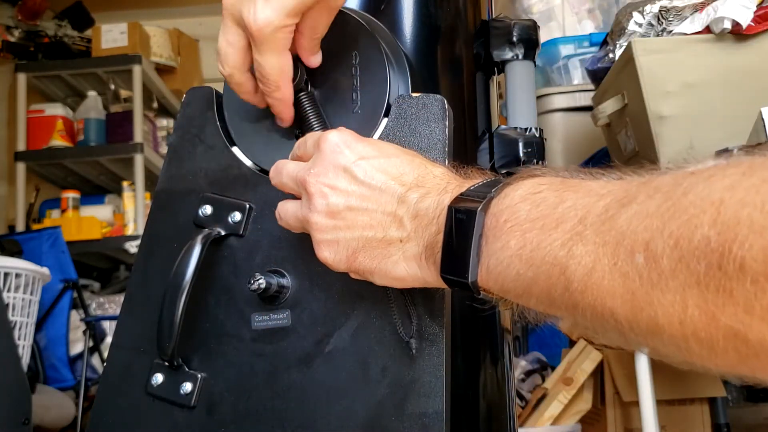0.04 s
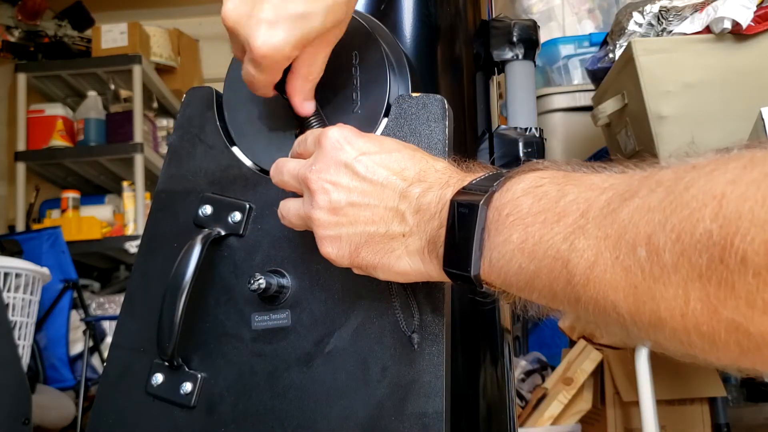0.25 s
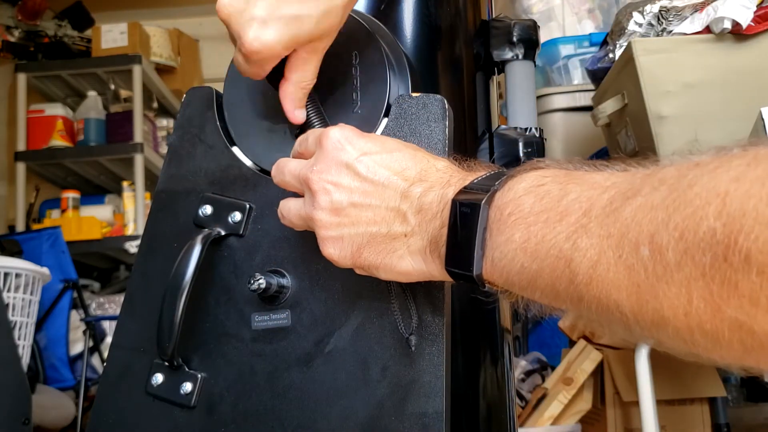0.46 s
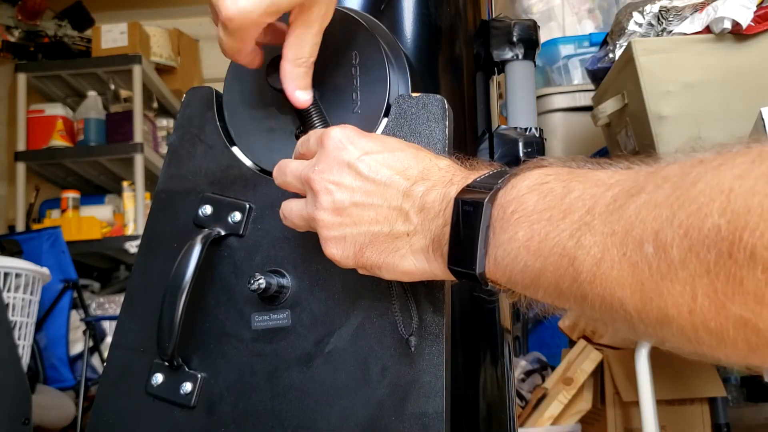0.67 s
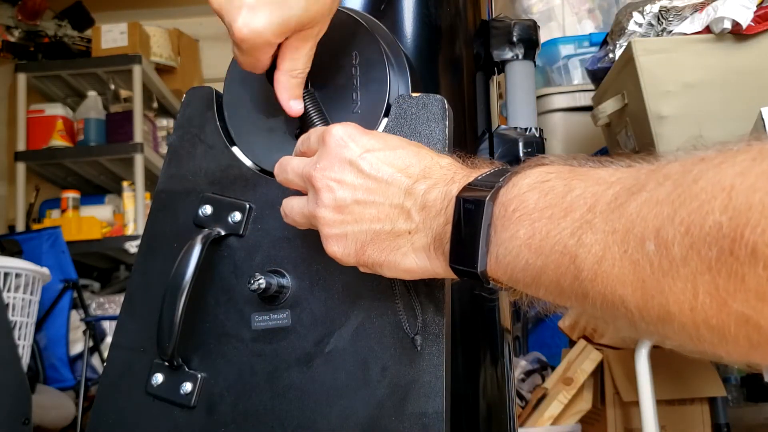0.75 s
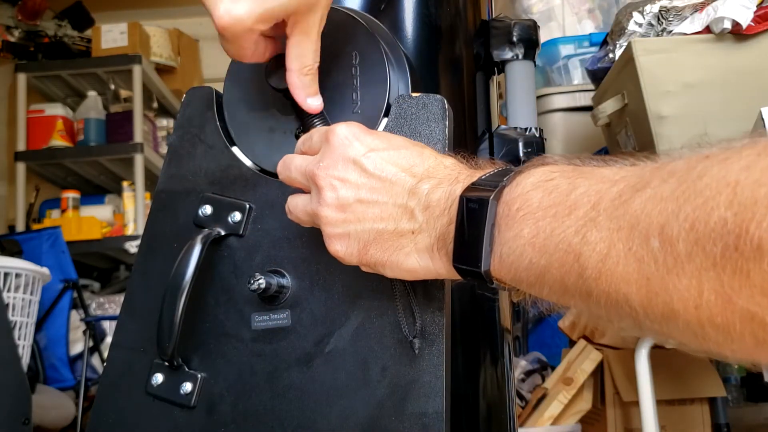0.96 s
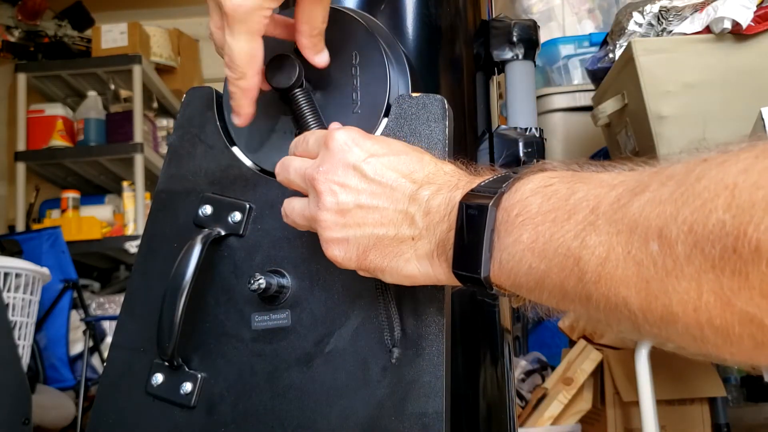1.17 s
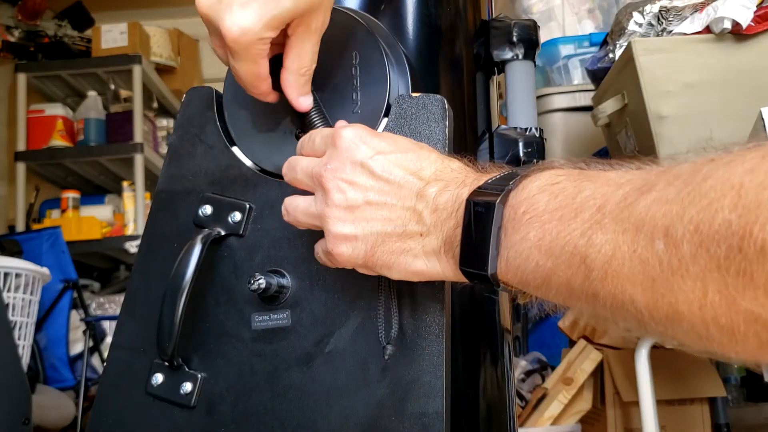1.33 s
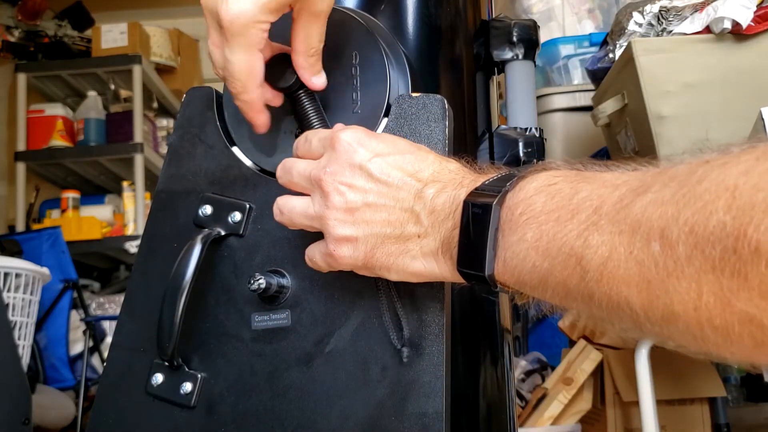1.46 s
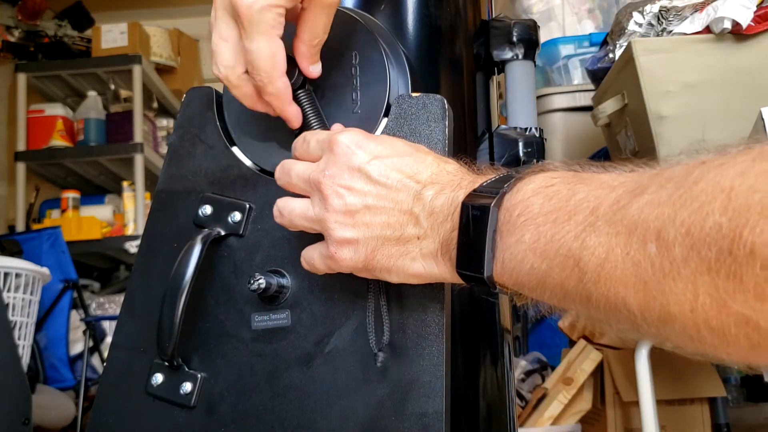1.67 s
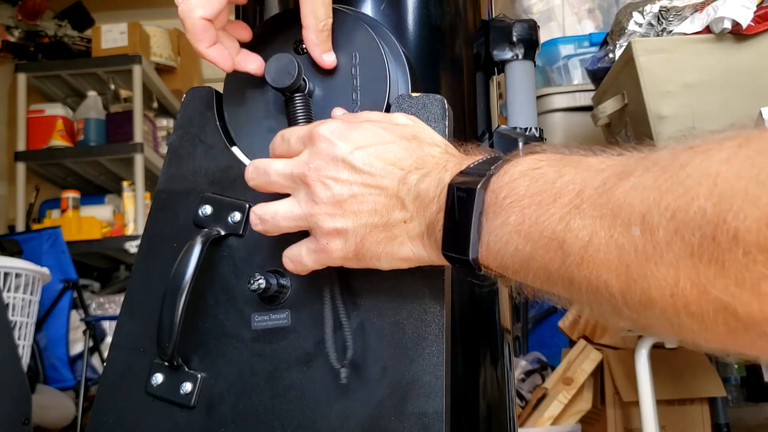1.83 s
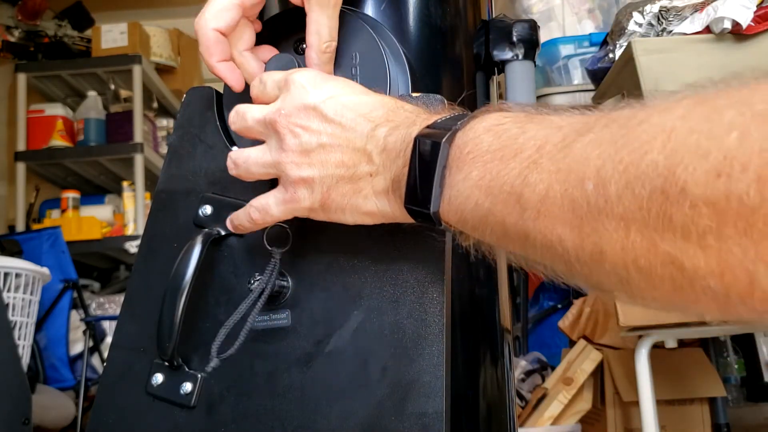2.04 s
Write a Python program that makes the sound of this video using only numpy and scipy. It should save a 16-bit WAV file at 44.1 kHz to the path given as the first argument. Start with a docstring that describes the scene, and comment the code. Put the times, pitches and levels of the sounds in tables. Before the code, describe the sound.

Short metallic clacks and scrapes as hands drag a spring across a metal edge.

```python
"""A coil spring clacks and scrapes as hands work it over the edge of a metal base.
Each coil catches and snaps free in a short ratcheting clack; dragging makes many tiny slips
that blur into a scrape. Base and spring ring briefly, and some clacks come with a pitched ring
or a bright crack. Edges tick and the small storage room answers. Under it all lie rubbing hands,
a machine hum and a low rumble."""
import sys
import numpy as np
from scipy import signal
from scipy.fft import rfft, irfft
from scipy.io import wavfile
from scipy.ndimage import uniform_filter1d

SR = 44100
rng = np.random.default_rng(int(sys.argv[2]) if len(sys.argv) > 2 else 0)


def dump_mix(stems):
    """Bounce the given channels to the path in sys.argv[1] as a 16-bit WAV at rate SR."""
    frames = np.atleast_2d(stems).T  # one column per channel
    limited = np.clip(frames, -1, 1)  # hard clip at full scale
    pcm = np.round(limited * 32767).astype(np.int16)
    wavfile.write(sys.argv[1], SR, pcm)


N = 92610  # 2.1 s

# Each catch of a coil; the last four columns are relative to the clack:
# t/s, rise/s, level/dB, bass/dB, treble/dB, base ring/dB, spring ring/dB
COIL_CLACKS = [(0.036, 0.0045, -37, 11.5, -31, 10, -13), (0.191, 0.0047, -39.5, 5.5, -15, 2, -15),
               (0.242, 0.0018, -25.5, -3.5, 17.5, 6, -6), (0.249, 0.0015, -40, -33, 13, -9, -1),
               (0.27, 0.0046, -32, -34, -4, -22, -3), (0.3055, 0.002, -24.5, -10, 8, -10, -8),
               (0.4925, 0.0019, -29, -5, 16.5, 8, 8), (0.5355, 0.0037, -31.5, 8.5, 13, 4, 1),
               (0.5684, 0.0012, -19, 1, 3.5, 5, -30), (0.7532, 0.0032, -38.5, 9, 12, 9, -2),
               (0.767, 0.002, -24.5, -4.5, -3.5, 3.5, -12.5), (0.8485, 0.0047, -27, -9, 4, 7, -10.5),
               (0.882, 0.0017, -34, 1, -19, -5.5, -12), (1.020, 0.0023, -49, 13, -12, 11, -3.5),
               (1.080, 0.00069, -37.5, 3, -8, -19, -12), (1.168, 0.0028, -30, -16, -7, -5, -12),
               (1.174, 0.0017, -27, 1, -2, -5, -13), (1.27, 0.0016, -35, -3, -2.5, 7, -7),
               (1.3183, 0.002, -31.5, -19, -6.5, 8.5, -30), (1.3475, 0.0016, -34, 8.5, -1.5, 0, -26),
               (1.387, 0.0037, -39.5, 10, -2.5, 12.5, -23), (1.446, 0.0017, -36, -3.5, -7, 8, -13),
               (1.611, 0.0058, -49.5, -14, -19, 10.5, -15), (1.671, 0.0041, -41.5, -9, -1, 19.5, -8),
               (1.688, 0.00023, -30.5, 1.5, 12, 5.5, -3), (2.017, 0.003, -53.5, -17, 13, 6.5, -9)]
def clack(rise_s, level_db, bass_db, treble_db, base_db, spring_db):
    """A coil snaps past the edge, knocks the base and sets the spring ringing."""
    hit = contact(bass_db, treble_db, hiss_db=-6.5, base_db=base_db, spring_db=spring_db)
    t = np.arange(hit.shape[1]) / SR
    return gain_of(level_db) * hit * np.minimum(t / rise_s, 1)


# Each drag over the edge: t/s, length/s, level/dB, bass/dB, treble/dB, top hiss/dB
SPRING_SCRAPES = [(0.0, 0.044, -46.5, 7, -5, 15), (0.025, 0.038, -46, -1.5, 12, 8.5),
                  (0.065, 0.045, -57, 8, -35, 4), (0.193, 0.04, -68, 38, -19, 11),
                  (0.262, 0.04, -30.5, -0.5, 0.5, 0), (0.305, 0.029, -29, 3.5, -7.5, -4),
                  (0.531, 0.043, -28.5, 4, 1, 8.5), (0.566, 0.019, -28.5, 4.5, 14.5, 3.5),
                  (0.785, 0.061, -40, 6, 3, 11), (1.028, 0.07, -47.5, -2, -5, 10),
                  (1.075, 0.057, -38.5, 2, -4.5, 12.5), (1.18, 0.0324, -45, 19.5, 7, 7),
                  (1.275, 0.021, -38.5, 19.5, 7, -3), (1.378, 0.061, -46.5, 13.5, 4.5, 7.5),
                  (1.455, 0.064, -59.5, 8, -9, -1), (1.658, 0.017, -40.5, -15, -12, 3),
                  (1.73, 0.021, -45, -17, 8, 9)]
def scrape(length, level_db, bass_db, treble_db, hiss_db):
    """The dragged spring sticks and slips in a run of tiny, uneven clacks."""
    slips_per_s, spread_db, grip_s, release_s, swell_db = 1500, 6, 0.0051, 0.013, 2
    t = np.arange(0, length, 1 / SR)
    slips = rng.random(len(t)) < slips_per_s / SR
    strength = gain_of(spread_db * np.clip(rng.standard_normal(len(t)), -2, 2))
    direction = rng.choice([-1, 1], len(t))
    pressure = np.minimum(t / grip_s, 1) * np.minimum((length - t) / release_s, 1)
    pressure *= gain_of(swell_db * (t / length - .5))  # grows as the spring is loaded
    kicks = evened(slips * strength * direction) * pressure
    one_slip = contact(bass_db, treble_db, hiss_db, base_db=-9.5, spring_db=-12.5)
    one_slip /= np.linalg.norm(one_slip[0])
    return gain_of(level_db) * signal.fftconvolve(kicks[None], one_slip, axes=1)


# The tone colour of every touch on the base: f/Hz, level/dB
TOUCH_COLOUR = [(40, -20.5), (120, -7), (180, -6), (235, -13), (350, -9), (520, -7), (850, 0), (1300, 0),
                (2000, -2), (2900, -7), (3250, -9), (4200, -9), (6600, -17), (7800, -15), (8900, -27),
                (11000, -28.5), (13000, -35), (16000, -38)]
# The tones the base rings with: f/Hz, level/dB, fade/s (a fade is the time to drop 60 dB)
BASE_TONES = [(785, -25, .25), (936, -22, .25), (1030, -24, .23), (1120, -24, .23), (1203, -14.5, .24),
              (1348, -19, .22), (1514, -22, .22), (1644, -24, .22), (2352, -25, .2), (3405, -30, .2),
              (3690, -29, .19), (4388, -28, .18)]
# The tones the spring rings with: f/Hz, level/dB, fade/s
SPRING_TONES = [(2083, -12, .06), (2710, -12, .09), (2790, -2, .125), (2897, -3, .12), (3008, -7, .09),
                (4250, -11, .05), (5890, -16, .08), (7660, -10, .05)]
def contact(bass_db, treble_db, hiss_db, base_db, spring_db, size=16384):
    """Metal touches the base: a noise burst, ringing metal, an echo off a near surface, the room."""
    fade_s, echo_s, echo_db, room_db = 0.035, 0.0105, -7, -7
    bass_hz, treble_hz, hiss_hz = 690, 3300, 9500
    t, hz = np.arange(size) / SR, np.fft.rfftfreq(size // 8, 1 / SR)
    tail = gain_of(room_db) * room_tail(t)
    burst = noise_pair(size) * gain_of(-60 * t / fade_s)
    echo = noise_pair(size) * gain_of(echo_db - 60 * abs(t - echo_s) / fade_s) * (t > echo_s)
    hit = colour(burst + echo + tail, evened(gain_of(read(TOUCH_COLOUR, hz))))
    hit += gain_of(base_db) * ring(BASE_TONES, t, scatter=0.95)
    tone_db = bass_db * (1 - shelf(hz / bass_hz, order=4))
    tone_db += treble_db * shelf(hz / treble_hz, order=2)
    tone_db += hiss_db * shelf(hz / hiss_hz, order=8)
    return colour(hit, gain_of(tone_db)) + gain_of(spring_db) * ring(SPRING_TONES, t, scatter=0.9)


def ring(tones, t, scatter):
    """Struck metal rings in fading tones, each shifted at random by up to `scatter` cycles."""
    hz, db, fade_s = np.transpose(tones)[:, :, None]
    db = db + rng.uniform(-.5, .5, hz.shape)  # each point of contact favours other tones
    fading = gain_of(db - 60 * t / fade_s)
    # high tones reach left and right out of step
    apart = np.arccos(read(STEREO_LIKENESS, hz)) * rng.choice([-.5, .5], hz.shape)
    phase = 2 * np.pi * (hz * t + scatter * rng.random(hz.shape))
    return np.array([(fading * np.sin(phase + side * apart)).sum(0) for side in (-1, 1)])


# Brief pitched rings and bright cracks that go with the clacks: t/s, f/Hz, width/Hz, level/dB, fade/s
RINGS_AND_CRACKS = [(0.242, 11000, 5000, -40, 0.043), (0.569, 1270, 564, -25, 0.11),
                    (0.569, 11400, 5000, -37.5, 0.08), (0.575, 2660, 220, -41, 0.21),
                    (0.768, 1370, 410, -28.5, 0.034), (0.768, 2860, 300, -36, 0.15),
                    (0.812, 790, 262, -35, 0.044), (0.851, 1490, 250, -37.5, 0.11),
                    (1.168, 12000, 4000, -51, 0.054), (1.270, 4080, 450, -43, 0.16),
                    (1.348, 930, 262, -38.5, 0.2), (1.688, 1195, 140, -30.5, 0.14)]
def ring_or_crack(hz, width_hz, level_db, fade_s, rise_s=0.0012, size=12000):
    """A fading band of noise: a pitched ring when narrow, a bright crack when high and wide."""
    t, f = np.arange(size) / SR, np.fft.rfftfreq(size, 1 / SR)
    band = np.exp(-2 * ((f - hz) / width_hz) ** 2)
    noise = evened(irfft(rfft(noise_pair(size)) * band, size))
    return noise * gain_of(level_db - 60 * t / fade_s) * np.minimum(t / rise_s, 1)


# Sharp, dry ticks: t/s, f/Hz, level/dB
EDGE_TICKS = [(0.2418, 8000, -25), (0.5682, 8500, -20), (0.708, 4900, -31.5)]
def tick(hz, level_db, cycles=0.7, size=64):
    """An edge snaps free with a tiny blip, the same on both sides."""
    t = (np.arange(size) - size / 2) / SR
    blip = np.exp(-(t * hz / cycles) ** 2) * np.sin(2 * np.pi * hz * t)
    return gain_of(level_db) * np.array([blip, blip])


# How long the room rings at each pitch: f/Hz, fade/s
ROOM_FADES = [(150, 0.39), (500, 0.35), (1400, 0.24), (3700, 0.25), (8000, 0.17), (15000, 0.25)]
def room_tail(t, build_s=0.0084):
    """Echoes off the walls build into a wash of noise, and each pitch fades at its own pace."""
    hz, age, bands = signal.stft(noise_pair(len(t)), SR, nperseg=256)
    bands *= gain_of(-60 * age / read(ROOM_FADES, hz)[:, None])
    wash = signal.istft(bands, SR)[1][:, :len(t)]
    return wash * (1 - np.exp(-t / build_s))


# How loudly the hands rub: t/s, level/dB
RUB_LEVELS = [(0, -60), (0.3, -59.5), (0.6, -54), (0.95, -54.5), (1.25, -65), (1.55, -59.5), (1.72, -55),
              (1.85, -66), (2.1, -68.5)]
# The dull colour of the rubbing: f/Hz, level/dB
RUB_COLOUR = [(30, -12), (100, -19), (185, 13), (240, -14.5), (290, -3.5), (370, -4), (450, -14.5),
              (560, 2), (900, -75), (4000, -65)]
def rubbing_hands():
    """The hands rub dully on the base until they let go."""
    level_db = np.interp(np.arange(N) / SR, *np.transpose(RUB_LEVELS))
    return gain_of(level_db) * coloured_noise(RUB_COLOUR)


# The tones of the hum: f/Hz, level/dB
HUM_TONES = [(72.5, -64), (118.6, -59), (174, -74), (288, -70)]
def machine_hum(waver=0.34):
    """A machine hums in low tones that each waver in strength and pitch."""
    t = np.arange(N) / SR
    hum = np.zeros(N)
    for hz, db in HUM_TONES:
        wobble = 1 + waver * (drift() + 1j * drift())
        tone = np.exp(2j * np.pi * (hz * t + rng.random()))
        hum += gain_of(db) * np.sqrt(2) * (wobble * tone).real
    return hum


# The colour of the room's own noise: f/Hz, level/dB
RUMBLE_COLOUR = [(20, -25), (40, -3.5), (52, -5), (72, 0), (95, -0.5), (125, -8), (160, -21), (240, -14),
                 (350, -15), (550, -28), (1000, -25), (2000, -28.5), (4000, -33.5), (8000, -36.5),
                 (10000, -44.5), (16000, -44)]
def room_rumble(level_db=-53.5):
    """The room holds a steady low rumble and a faint hiss."""
    return gain_of(level_db) * coloured_noise(RUMBLE_COLOUR)


# How alike left and right are: f/Hz, likeness (0 unrelated, 1 the same)
STEREO_LIKENESS = [(60, 0.98), (290, 0.88), (640, 0.69), (1400, 0.3), (3100, 0.01), (15000, 0.03)]
def noise_pair(size):
    """White noise for left and right, alike in the bass and unrelated in the treble."""
    left, other = np.exp(2j * np.pi * rng.random((2, size // 2 + 1)))
    same = read(STEREO_LIKENESS, np.fft.rfftfreq(size, 1 / SR))
    right = same * left + np.sqrt(1 - same ** 2) * other
    return evened(irfft(np.array([left, right]), size))


def coloured_noise(points):
    """Stereo noise of strength 1, its tone shaped by a table."""
    gain = gain_of(read(points, np.fft.rfftfreq(N, 1 / SR)))
    return evened(irfft(rfft(noise_pair(N)) * gain, N))


def colour(x, gain):
    """Turns each frequency up or down, with no ringing ahead of the hit."""
    log_gain = np.log(np.maximum(np.r_[gain, gain[-2:0:-1]], 1e-5))
    taps = np.fft.ifft(np.exp(np.conj(signal.hilbert(log_gain)))).real
    return signal.fftconvolve(x, taps[None, :len(gain)], axes=1)[:, :x.shape[1]]


def drift(size=3000):
    """Slow random wandering, smoothed over `size` samples."""
    return evened(uniform_filter1d(uniform_filter1d(rng.standard_normal(N), size), size))


def shelf(ratio, order):
    """A smooth step from 0 to 1 around ratio 1."""
    return ratio ** order / (1 + ratio ** order)


def read(points, hz):
    """Looks up a table between its rows, on a log scale of frequency."""
    f, value = np.transpose(points)
    return np.interp(np.log(hz + 1), np.log(f + 1), value)


def gain_of(db):
    """Turns decibels into a multiplier."""
    return 10 ** (np.asarray(db) / 20)


def evened(x):
    """Scales to an average strength (rms) of 1."""
    return x / np.sqrt(np.mean(x ** 2) + 1e-20)


def scene():
    """Clacks, scrapes, rings, cracks and ticks, each at its time, over the background."""
    mix = rubbing_hands() + machine_hum() + room_rumble()
    for table, source in ((COIL_CLACKS, clack), (SPRING_SCRAPES, scrape),
                          (RINGS_AND_CRACKS, ring_or_crack), (EDGE_TICKS, tick)):
        for start_s, *row in table:
            sound = source(*row)
            slot = mix[:, round(start_s * SR):][:, :sound.shape[1]]
            slot += sound[:, :slot.shape[1]]
    return mix


# How much louder the left side is than the right: f/Hz, level/dB
LEFT_LEAN = [(100, 1), (380, -0.5), (700, 4.5), (1300, 1.5), (2400, 0.9), (4400, 3.5), (8000, -0.5),
             (15000, 4.5)]
def record(dry, top_hz=16000):
    """The sound leans a little to the left, and the very highest treble is cut."""
    lean_db = read(LEFT_LEAN, np.fft.rfftfreq(N, 1 / SR)) * np.array([[.5], [-.5]])
    heard = irfft(rfft(dry) * gain_of(lean_db), N)
    treble_cut = signal.firwin(401, top_hz, window=("kaiser", 9), fs=SR)
    return signal.oaconvolve(heard, treble_cut[None], "same")


dry = scene()
out = record(dry)
dump_mix(out)
```